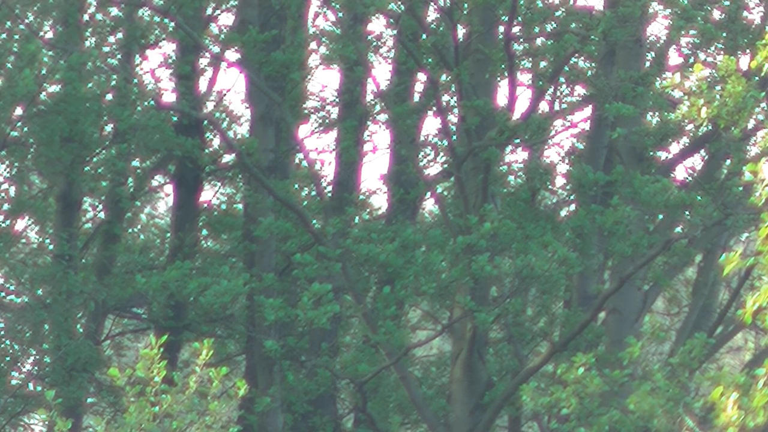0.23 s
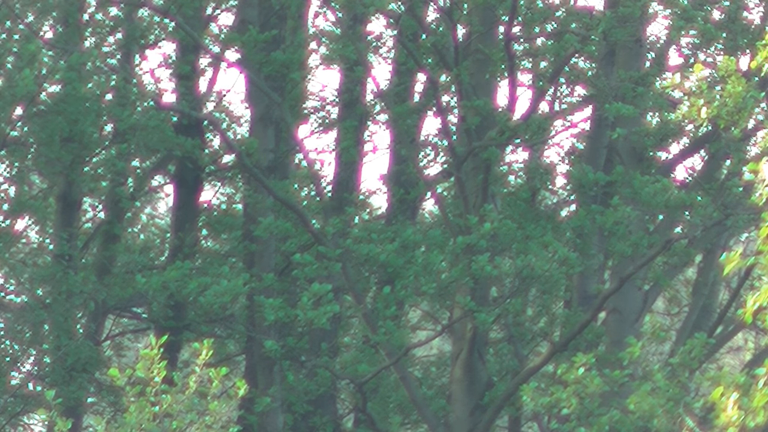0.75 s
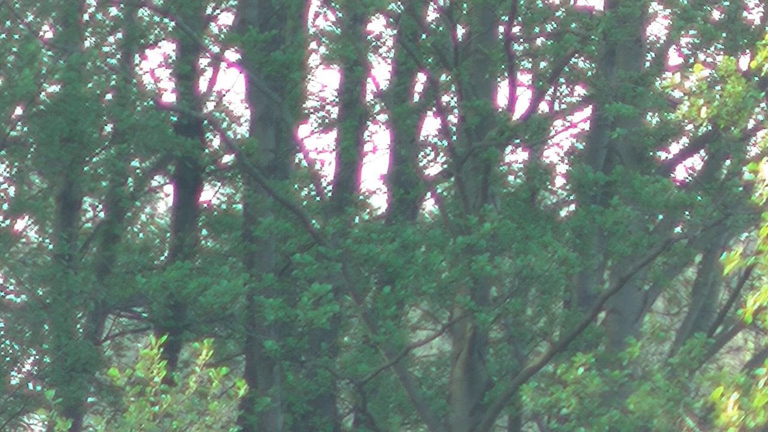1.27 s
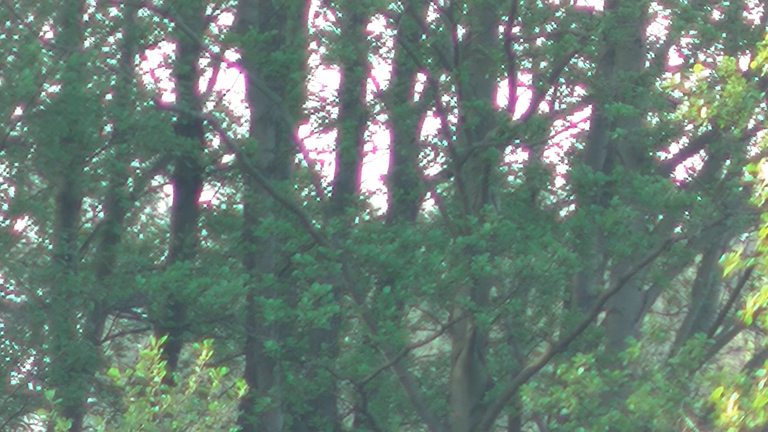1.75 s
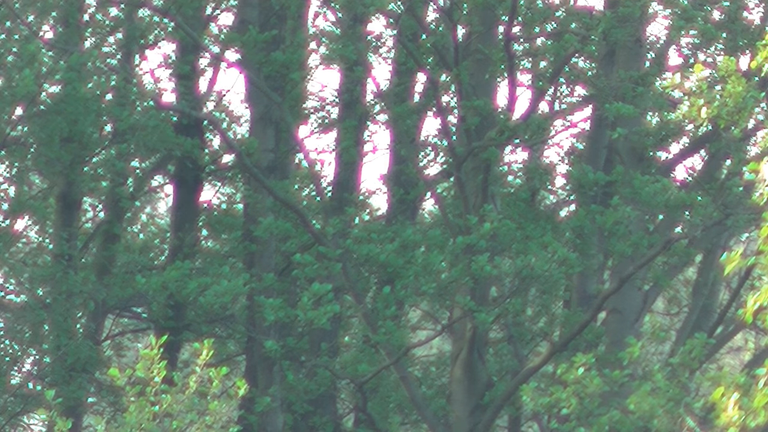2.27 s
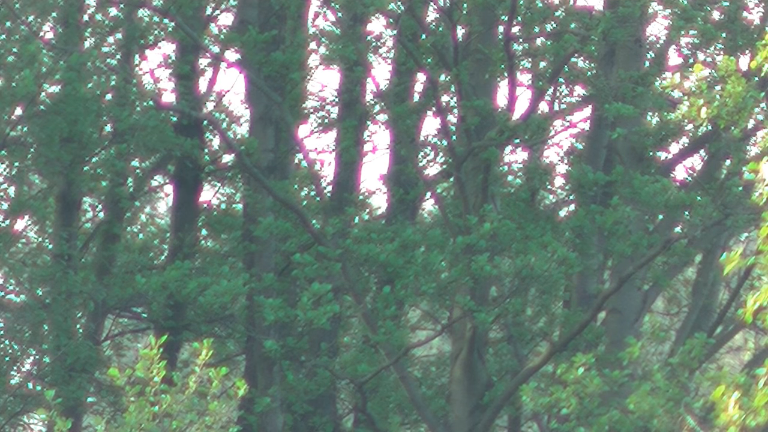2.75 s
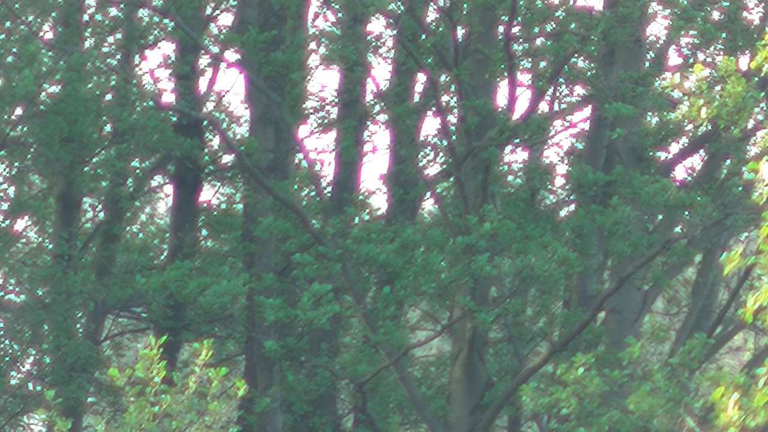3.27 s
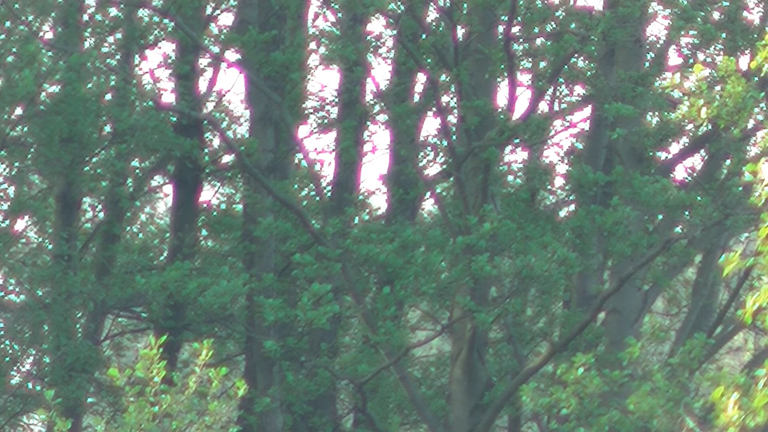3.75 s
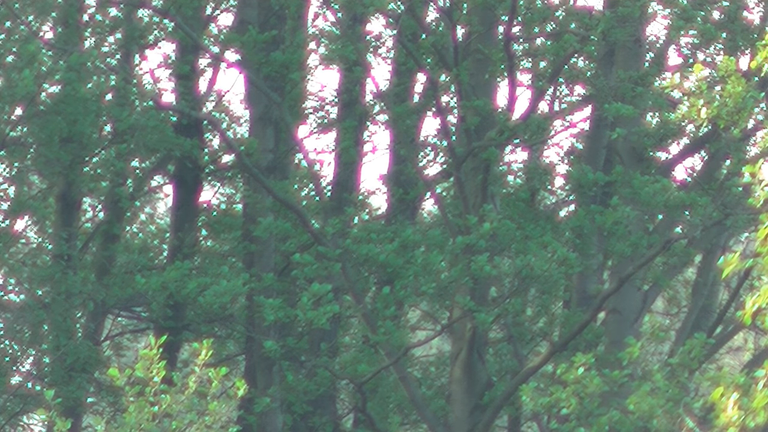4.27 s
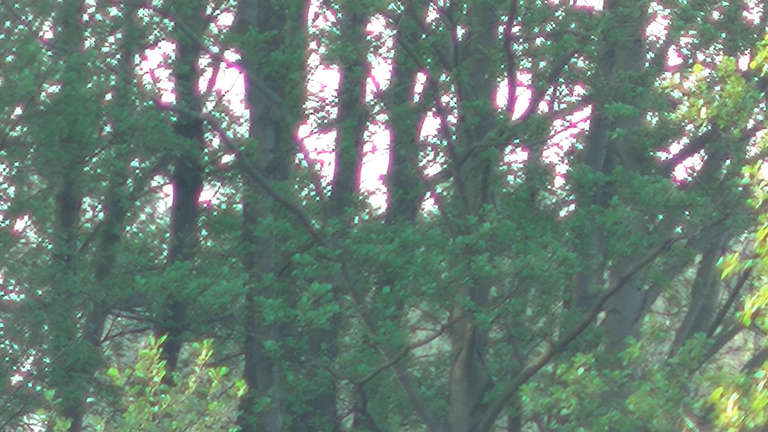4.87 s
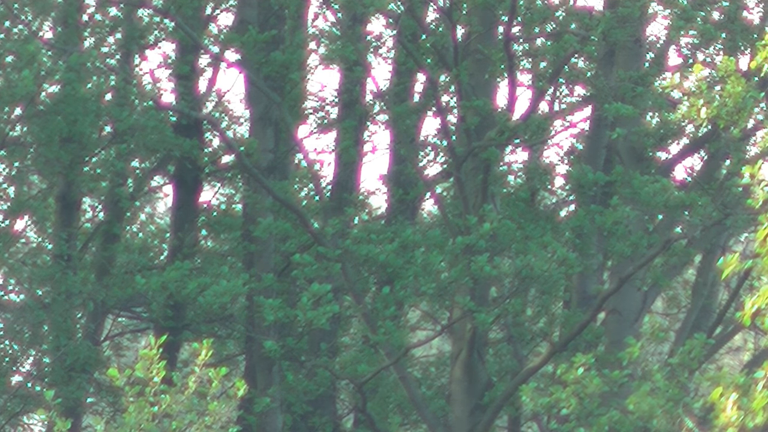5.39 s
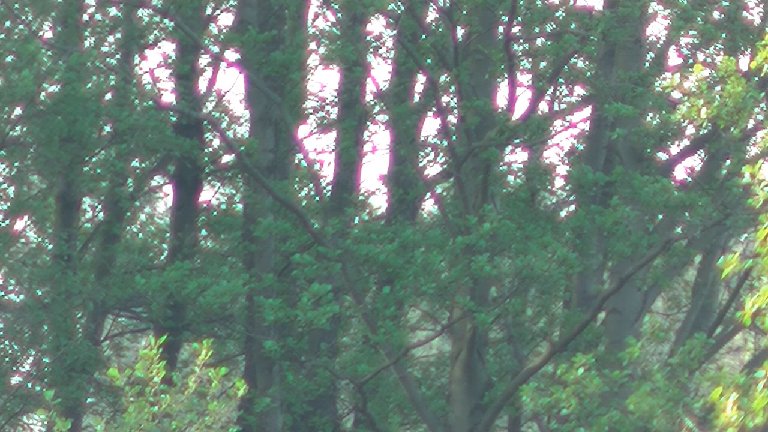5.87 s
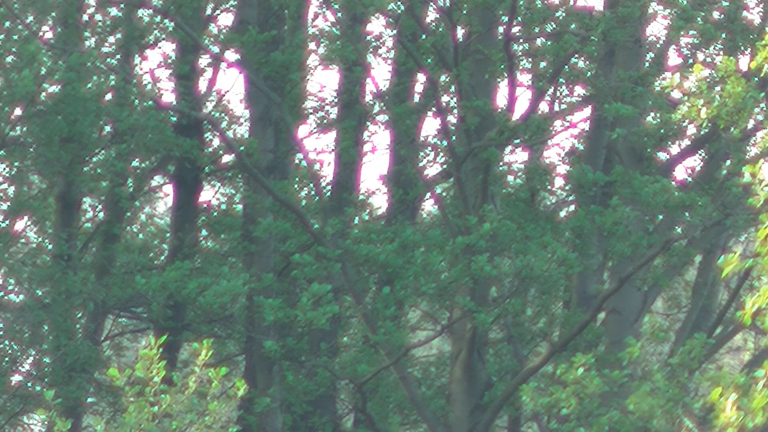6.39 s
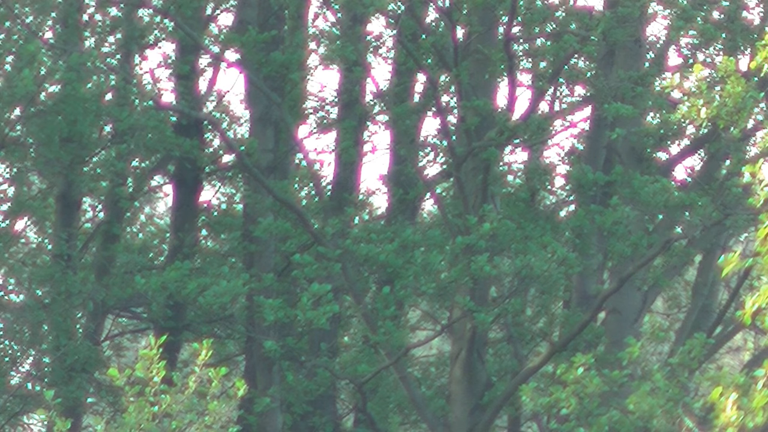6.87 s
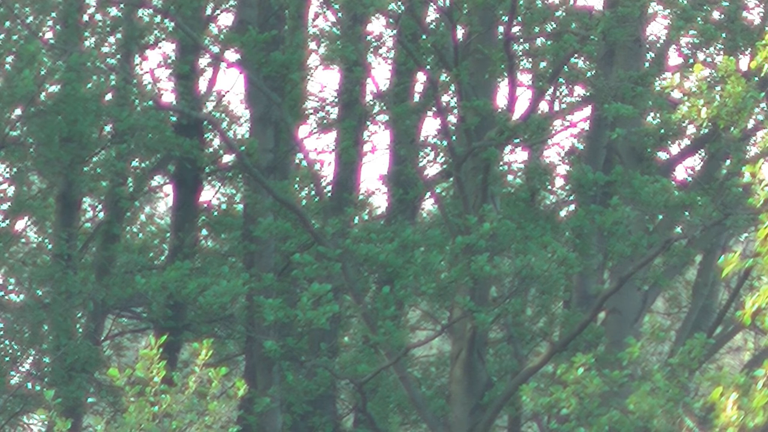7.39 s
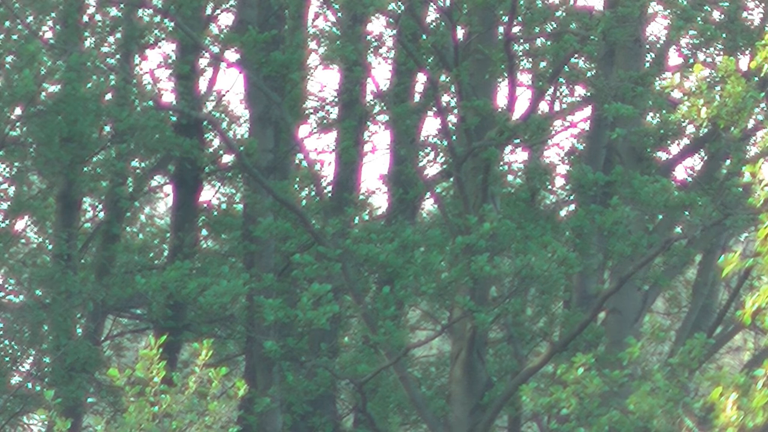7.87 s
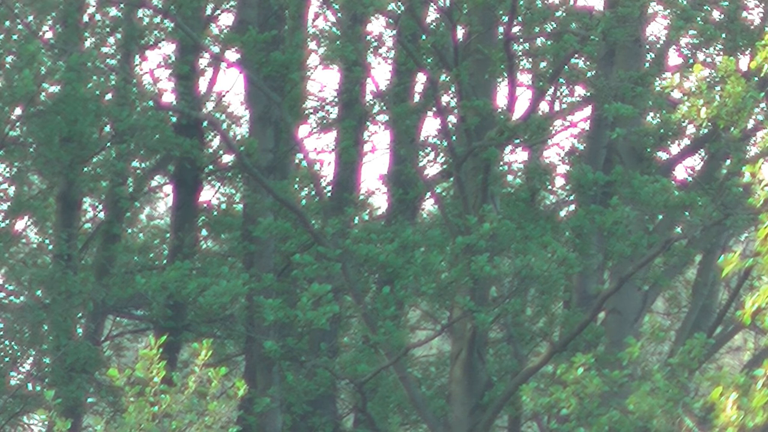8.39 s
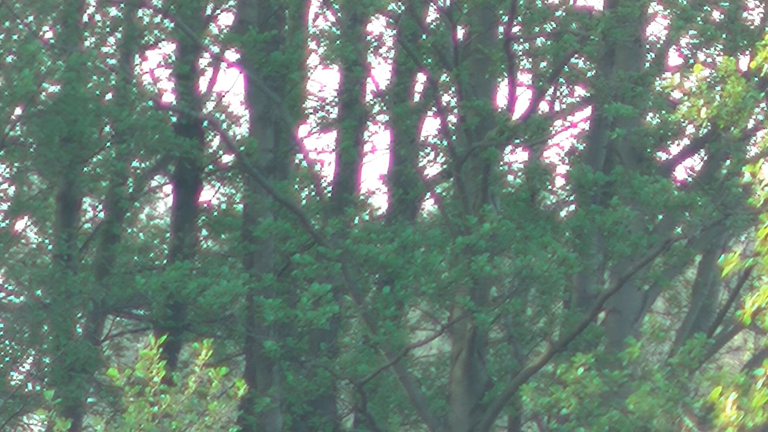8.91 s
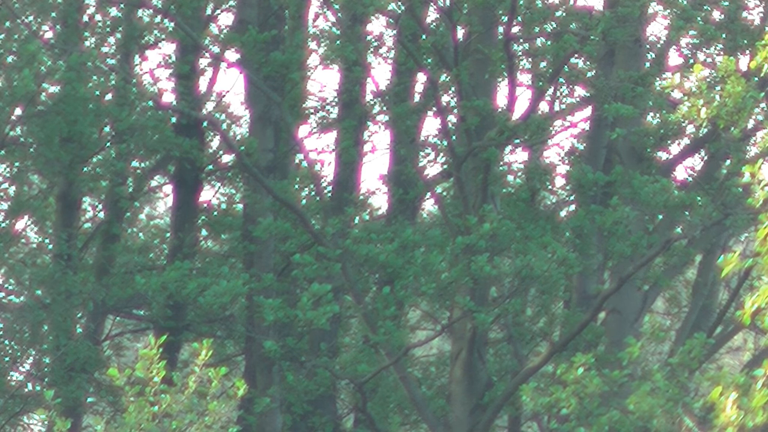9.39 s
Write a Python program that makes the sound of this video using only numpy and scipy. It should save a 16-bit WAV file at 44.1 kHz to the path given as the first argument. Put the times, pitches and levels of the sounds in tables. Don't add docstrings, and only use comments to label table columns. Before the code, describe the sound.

Dense dawn birdsong runs from start to finish: quick falling whistles and clean chips first, then a single woodpecker roll of about thirty knocks with a woody ring, harsh chirps around it. Low flute notes and falling trills follow, then rising swees, plunging notes, quick upward whips and rough churs. Trees smear the sound gently. A bass-poor, almost mono microphone leaves soft hiss and a faint high whine.

```python
import sys
import numpy as np
from scipy import signal
from scipy.fft import rfft, irfft, next_fast_len
from scipy.io import wavfile
from scipy.ndimage import map_coordinates

SR = 44100
rng = np.random.default_rng(int(sys.argv[2]) if len(sys.argv) > 2 else 0)


def volts(x):
    e = np.asarray(x, float) / 20
    return 10 ** e


def unload_wav(signal):
    wavfile.write(
        sys.argv[1],
        SR,
        np.round(np.clip(np.atleast_2d(signal).T, -1, 1) * 32767).astype(np.int16),
    )


N = 425565


def along(points, hz):
    f, v = np.transpose(points)
    return np.interp(np.log(hz + 1), np.log(f + 1), v)


def unit(x):
    return x / np.sqrt(np.mean(x ** 2) + 1e-20)


def wobble(rate):
    knots = rng.standard_normal(int(N * rate / SR) + 4)
    return map_coordinates(knots, [np.arange(N) * rate / SR])


def filtered(x, response):
    m = next_fast_len(N + SR // 2)
    return irfft(rfft(x, m) * response(np.fft.rfftfreq(m, 1 / SR)), m)[..., :N]


def above(x, edge_hz, order):
    return signal.sosfilt(signal.butter(order, edge_hz, "high", fs=SR, output="sos"), x)


# blow number, time in seconds.
ROLL = [
    (0, 1.9487),
    (11, 2.5379),
    (15, 2.7594),
    (18, 2.921),
    (31, 3.6396),
]


def pecks():
    full_db, run_up_db, run_up_blows = -18.5, 7.5, 1.28
    tire_db, tire_blows = 4, 0.82
    scatter_s, scatter_db = .0004, .6
    number, s = np.transpose(ROLL)
    k = np.arange(number[-1] + 1)
    late, hard = rng.standard_normal((len(k), 2)).T
    db = full_db - run_up_db * np.exp(-k / run_up_blows) - tire_db * np.exp(-k[::-1] / tire_blows)
    return zip(np.interp(k, number, s) + scatter_s * late, db + scatter_db * hard)


# pitch in Hz, width in Hz, level in dB.
TRUNK = [(1225, 320, 4.5), (1750, 400, 1.5), (2250, 500, -3.5), (3300, 1200, -14)]
# pitch in Hz, width in Hz, level in dB.
STUB = (1465, 150, -1)


def mode(f, centre_hz, width_hz, db):
    damping = 1j * f * width_hz
    return volts(db) * damping / (centre_hz ** 2 - f * f + damping)


def woodpecker():
    blows = np.zeros(N)
    for s, db in pecks():
        blows[round((s - .0009) * SR)] = volts(db + 25.0)

    def response(f):
        trunk = sum((-1) ** k * mode(f, *row) for k, row in enumerate(TRUNK))
        ground = 1 - .7 * np.exp(-2j * np.pi * f * .00198)
        return trunk * ground - mode(f, *STUB)

    return above(filtered(blows, response), edge_hz=1000, order=5)


def add(out, s, hz, gain, nasal_db=-60):
    phase = 2 * np.pi * (np.cumsum(hz) / SR + rng.random())
    nasal = np.sin(phase / 2) + .22 * np.sin(3 * phase / 2)
    tone = np.sqrt(2) * gain * (np.sin(phase) + volts(nasal_db) * nasal)
    out[max(round(s * SR), 0):][:len(tone)] += tone


def swell(length, ramp, onset=.7):
    u = np.linspace(0, 1, max(int(length * SR), 9))
    edge = np.minimum(u / onset, 1 - u) * length / min(ramp, length / 2)
    return u, np.sin(np.pi / 2 * np.clip(edge, 0, 1)) ** 2


def note(out, s, length, start_hz, mid_hz, end_hz, db, throat_db=0):
    u, shape = swell(length, ramp=0.01668)
    bend = 4 * u * (1 - u) * (mid_hz - (start_hz + end_hz) / 2)
    hz = start_hz + (end_hz - start_hz) * u + bend
    throat_loss = throat_db * np.abs(hz - 3956) / 1000
    nasal_db = -21 if length < .07 and mid_hz > 3100 else -60
    add(out, s, hz, volts(db - throat_loss) * shape, nasal_db)


# start in seconds, length in seconds, level in dB.
DIVES = [
    (0.021, 0.0238, -21),
    (0.299, 0.0442, -22),
    (0.551, 0.0542, -22.5),
    (0.783, 0.0446, -22.5),
]
# start in seconds, length in seconds, top in Hz, level in dB.
WHIPS = [
    (7.288, 0.0209, 4773, -20),
    (7.339, 0.0259, 4332, -23),
    (7.476, 0.0209, 4277, -20.5),
    (7.656, 0.0188, 4839, -21),
    (7.806, 0.0477, 4730, -23.5),
    (7.978, 0.057, 4666, -22.5),
    (8.14, 0.0493, 4820, -23),
    (8.337, 0.049, 4546, -21),
]


def dives_and_whips(out):
    top_hz, floor_hz, fall_s = 4425, 1496.8, .035
    for s, length, db in DIVES:
        fall = np.exp(-length / fall_s * np.arange(3) / 2)
        note(out, s, length, *floor_hz + (top_hz - floor_hz) * fall, db + 4, throat_db=8.5)
    for s, length, top_hz, db in WHIPS:
        slow = length > .035
        note(out, s, length, 2800, (.86 if slow else .76) * top_hz, top_hz, db + 1.5, throat_db=4)
        if slow:
            note(out, s + 0.0033, length, 2344, 2680, 2973, db - 12.5)


# start in seconds, level in dB.
DUETS = [
    (1.592, -28),
    (1.789, -27),
    (2.025, -26.5),
]
CHACKS = [
    (3.51, -20.5),
    (3.561, -21),
]
SWEES = [
    (5.375, -24.5),
    (5.662, -23.5),
    (5.913, -23),
]
CHOOS = [
    (6.291, -24.5),
    (6.511, -25.5),
    (6.739, -24),
]
CHURS = [
    (8.553, -22),
    (8.739, -21.5),
    (8.956, -22.5),
]
CLIMBS = [
    (3.754, -22.5),
    (4.022, -23),
]
ZITS = [
    (9.147, -23),
    (9.222, -27.5),
    (9.357, -25),
    (9.427, -27.5),
    (9.598, -25.5),
]


def syllables(out):
    for s, db in DUETS:
        note(out, s, 0.075, 3950, 4020, 3534, db)
        note(out, s, .085, 2700, 2620, 2413, db - 10)
    for s, db in CHACKS:
        note(out, s, 0.0278, 4260, 4030, 3350, db - 4)
        note(out, s + 0.0028, 0.02695, 3363, 3130, 2754, db)
    for s, db in SWEES:
        note(out, s, .072, 2880, 3290, 3350, db + 1.5)
        note(out, s + 0.0046, 0.0502, 4512, 4900, 4950, db - 22.5)
        note(out, s, 0.0598, 1395, 1650, 1830, db - 24)
        note(out, s + .006, .065, 4300, 4150, 4583, db - 7)
        note(out, s + .022, .05, 3230, 3500, 4544, db - 0.5)
    for s, db in CHOOS:
        note(out, s - .047, .032, 3263, 2370, 2090, db - 7.0)
        note(out, s - .033, 0.0217, 5132, 4450, 4370, db - 12.5)
        note(out, s, .046, 3860, 2480, 2085, db)
        note(out, s + .013, .026, 4971, 4370, 3570, db - 10.5)
    for s, db in CHURS:
        note(out, s, 0.05, 4050, 3300, 2618, db + 3.5, throat_db=7.5)
        note(out, s + .004, .04, 2433, 2150, 1910, db - 21.5)
    for s, db in CLIMBS:
        note(out, s, .055, 2295.7, 3130, 3313, db - 5.0)
        note(out, s + .038, .036, 3276.5, 3580, 4120, db)
    for s, db in ZITS:
        note(out, s, 0.01242, 5265, 3833, 2950, db - 4)


# start in seconds, length in seconds, start in Hz, end in Hz, level in dB.
THROBS = [
    (8.683, 0.0622, 3348, 3528, -19.5),
    (9.055, 0.077, 3256, 3596, -27),
    (9.405, 0.077, 3258, 3501, -23.5),
]


def throbs(out):
    throb_hz, depth = 46, .7
    for s, length, start_hz, end_hz, db in THROBS:
        u, shape = swell(length, ramp=0.0145)
        pulse = 1 - depth * np.cos(np.pi * throb_hz * length * u) ** 2
        add(out, s, start_hz + (end_hz - start_hz) * u, volts(db) * shape * pulse)


# time of its third, longest note in seconds, level in dB.
THIN_SONGS = [
    (3.013, -44.5),
    (9.265, -41),
]
# share of the note from 0 to 1, pitch in Hz.
CHIRP = [(0, 5684), (.2, 6980), (.35, 7200), (1, 6092)]


def thin_songs(out):
    for s, db in THIN_SONGS:
        note(out, s - .29, 0.089, 8120, 8050, 7980, db - 9)
        note(out, s - .215, 0.123, 8000, 7900, 7830, db + 1.0)
        note(out, s, 0.179, 7780, 7830, 7760, db + 1.0)
        u, shape = swell(.055, ramp=0.0128)
        for later in .25, .35:
            add(out, s + later, np.interp(u, *np.transpose(CHIRP)), volts(db + 3.5) * shape)


# start in seconds, length in seconds, start in Hz, end in Hz,
# level in dB. Slides run nearly straight.
SLIDES = [(0.008, 0.065, 3305, 2540, -23.5), (0.508, .05, 5700, 4250, -41),
          (0.737, 0.096, 3130, 2360, -32.5), (0.878, 0.064, 5700, 3950, -34),
          (1.023, 0.047, 3680, 2280, -28.5), (2.32, 0.0263, 2450, 2400, -35),
          (2.438, 0.035, 3740, 2970, -32.5), (2.471, 0.029, 3510, 3420, -25),
          (2.516, 0.0753, 3760, 4030, -30.5), (2.523, 0.038, 2500, 2602, -25.5),
          (2.679, 0.0295, 3855, 3400, -23), (3.137, 0.047, 3000, 2540, -38.5),
          (3.542, 0.05, 2740, 2800, -36.5), (3.74, 0.034, 7100, 5730, -45), (4.123, .06, 3440, 4542, -36.5),
          (1.452, 0.0601, 2480, 2330, -39), (2, .04, 2700, 2400, -40.5),
               (.11, 0.0433, 3100, 2100, -36), (.255, 0.0163, 3800, 3850, -30),
               (.49, 0.0554, 4350, 3750, -34.5), (.455, 0.0405, 3400, 2900, -36.5),
               (.75, 0.0403, 4500, 4050, -35), (6.8, 0.0299, 3750, 4500, -36.5),
               (6.425, 0.0495, 3600, 2900, -40), (6.535, 0.0205, 3500, 2900, -30.5),
               (6.56, 0.0394, 2950, 3250, -37.5), (7.512, 0.0305, 2100, 2380, -32.5),
               (9.315, 0.0295, 2100, 2227, -40), (9.525, .07, 3500, 4100, -40),
               (2.843, .016, 3600, 2600, -40.5), (8.869, 0.07, 4200, 3850, -40.5),
               (8.853, .032, 4600, 3400, -35), (9.117, 0.048, 2150, 2210, -43),
               (9.25, 0.0436, 3530, 3300, -40), (4.374, .024, 5800, 3800, -38.5),
               (4.46, .02, 5500, 3600, -39.5), (6, .03, 3350, 2600, -38), (8.463, 0.0312, 3150, 2600, -37),
               (8.518, 0.015, 2600, 2100, -41.5), (9.6, .014, 2480, 2520, -37),
               (7.1, .032, 3900, 2800, -35), (2.7, .032, 3950, 4200, -32), (3.15, 0.034, 3350, 2950, -40),
               (4.5, 0.016, 2750, 2780, -31), (8.095, .035, 1800, 2400, -41.5),
               (8.275, 0.0307, 1950, 2700, -41.5), (5.815, .03, 4900, 4450, -48.5),
               (8.29, 0.0163, 3300, 3900, -35.5), (4.468, .016, 2250, 1800, -34),
               (2.683, .03, 2300, 2300, -37), (9.616, 0.034, 4520, 3560, -28)]
FLUTES = [(0.268, 0.1246, 2467, 2674, -26), (0.367, 0.178, 2915, 2643, -28.5),
          (3.903, .068, 1800, 2020, -40), (4.023, 0.0552, 2021, 1867, -34.5),
          (4.339, 0.035, 3354, 2183, -30.5), (4.354, 0.0376, 4350, 3520, -24.5),
          (4.392, 0.0626, 3685, 2416, -23.5), (4.272, 0.1236, 2001, 1748, -35),
          (4.549, 0.075, 2010, 2280, -32), (4.44, 0.104, 1443, 1561, -47.5),
          (4.766, 0.064, 1664, 1601, -45.5), (4.958, .14, 1850, 1579, -46.5),
          (5.295, 0.0794, 2458, 2372, -35.5), (5.361, 0.066, 1722, 1850, -37.5),
          (5.599, 0.1274, 2402, 2800, -26.5), (5.716, 0.037, 2722, 2942, -25)]
HOOKS = [(0.222, 0.0645, 1616, 2355, -31.5), (2.307, 0.038, 4050, 3610, -27),
         (3.865, 0.0446, 5900, 5160, -37), (3.883, 0.0613, 3820, 3495, -32.5),
         (4.652, .095, 3250, 3800, -33), (4.185, 0.13, 2070, 2339, -23), (6.9, 0.03, 2830, 3290, -42),
         (7.745, 0.0374, 1960, 3120, -25), (8.194, 0.067, 5950, 5670, -41.5),
         (8.239, 0.14, 5600, 5550, -44.5), (8.36, 0.091, 5800, 5400, -51), (5.038, .032, 3120, 4370, -30.5),
         (5.082, 0.0208, 3000, 4230, -30.5), (5.233, .028, 3470, 4030, -40.5),
         (5.051, .03, 2270, 2570, -33), (5.308, 0.0198, 5900, 3500, -40), (9.003, .05, 1530, 1890, -49),
         (4.396, 0.0157, 3900, 4550, -32.5), (4.4, 0.014, 4200, 4330, -31), (5.05, .028, 5300, 5500, -46.5),
         (5.083, 0.031, 4500, 5180, -42.5), (1.286, 0.072, 3730, 3880, -29), (0.94, .03, 4000, 3000, -37.5),
         (9.589, 0.043, 5180, 3400, -33)]
FLICKS = [(2.715, 0.0412, 3816, 3423, -25), (2.728, 0.0285, 2610, 2294, -29),
          (4.248, 0.028, 4250, 3300, -35.5), (4.301, 0.03, 3950, 3103, -29),
          (4.86, 0.0955, 3440, 2958, -27), (5.292, 0.0163, 3265, 5500, -42),
          (3.955, 0.0208, 1977, 2620, -30.5), (3.981, 0.0208, 1966, 2860, -32.5),
          (4.003, 0.021, 2062, 2500, -29.5), (7.387, 0.0278, 2435, 3030, -29),
          (7.698, 0.0214, 2526, 3250, -26), (8.327, 0.033, 3335, 4820, -34.5),
          (9.47, 0.0463, 3380, 2430, -29.5), (4.752, 0.16, 3670, 3466, -40.5),
          (9.118, 0.0508, 3616, 2914, -29), (8.527, 0.061, 4140, 3810, -35)]
GONE_AT_HALF = (0.54, .5, 0.9776, 0.1395)
# start in seconds, length in seconds, end in Hz, middle in Hz,
# level in dB.
BOWS = [
    (0.919, 0.049, 4800, 4190, -30),
    (0.946, 0.0657, 3630, 4180, -37),
    (1.012, 0.037, 4520, 3583, -22.5),
    (1.034, 0.072, 3160, 3740, -31.5),
    (4.448, 0.0496, 2820, 2980, -32),
    (4.168, 0.016, 1880, 2200, -35.5),
    (1.3, 0.0773, 2200, 2590, -34),
]


def whistles(out):
    tables = SLIDES, FLUTES, HOOKS, FLICKS
    for table, gone in zip(tables, GONE_AT_HALF):
        for s, length, start_hz, end_hz, db in table:
            note(out, s, length, start_hz, start_hz + gone * (end_hz - start_hz), end_hz, db)
    for s, length, end_hz, mid_hz, db in BOWS:
        note(out, s, length, end_hz, mid_hz, end_hz, db)


def held_flute(out):
    length, start_hz, end_hz = 0.2614, 2500, 2665
    u, shape = swell(length, ramp=0.0148)
    hz = end_hz + (start_hz - end_hz) * np.exp(-u * length / .07)
    add(out, 4.5, hz, volts(-18.5 - 7 * u) * shape)


# start in seconds, length in seconds, sweeps a second, from Hz, level in dB.
TRILLS = [
    (4.51, 0.153, 43.7, 4302, -24.5),
    (4.811, 0.134, 44, 4272, -26.5),
    (5.099, 0.114, 42, 4065, -25.5),
]
# start in seconds, length in seconds, sweeps a second, from Hz, to Hz.
FAINT_TRILLS = [
    (1.515, 0.114, 55, 4798, 5750),
    (3.8, 0.079, 78, 7000, 5300),
]
# start in seconds, length in seconds, sweeps a second, from Hz, to Hz, level in dB.
STUTTERS = [
    (6.988, 0.0416, 79, 2400, 3900, -29.5),
    (7.102, 0.0344, 51.9, 3200, 4500, -28.5),
    (7.07, .03, 65, 2600, 4700, -32.5),
]


def trills(out):
    falling = [(*row, hz, 2800, db) for *row, hz, db in TRILLS]
    faint = [(*row, -40.5) for row in FAINT_TRILLS]
    for s, length, rate, from_hz, to_hz, db in falling + faint + STUTTERS:
        u, shape = swell(length, ramp=0.0126)
        beat = (u * length * rate) % 1
        slide = 1 - (1 - beat) ** 1.7
        pulse = np.sin(np.pi * beat ** 1.105) ** 1.58
        add(out, s, from_hz + (to_hz - from_hz) * slide, volts(db) * (0.149 + 0.934 * shape) * pulse)


# start in seconds, length in seconds, wobbles a second, centre in
# Hz, swing in Hz.
WARBLES = [
    (4.597, 0.075, 45, 2416, 350),
]
SOFT_WARBLES = [
    (4.634, 0.1073, 47.4, 1925, 83.5),
    (5.413, 0.1345, 35, 1980, 226),
    (3.394, 0.074, 20, 3120, -260),
]


def warbles(out):
    for table, db in (WARBLES, -25.5), (SOFT_WARBLES, -34):
        for s, length, rate, centre_hz, swing_hz in table:
            u, shape = swell(length, ramp=0.0122)
            add(out, s, centre_hz + swing_hz * np.sin(2 * np.pi * rate * length * u), volts(db) * shape)


def songbirds():
    out = np.zeros(N + SR)
    for sing in dives_and_whips, syllables, throbs, thin_songs, whistles, held_flute, trills, warbles:
        sing(out)
    return out[:N] * volts(1.3 * np.tanh(wobble(90)))


# start in seconds, length in seconds, start in Hz,
# end in Hz, level in dB.
RASPS = [
    (1.633, 0.0426, 3590, 2995, -32.5),
    (1.827, 0.036, 3880, 3291, -29.5),
    (2.273, 0.025, 3546, 3590, -28.5),
    (2.478, 0.022, 3680, 3980, -28),
    (2.521, 0.0205, 3796, 3915, -24.5),
]
BURRS = [(3.285, 0.0455, 4400, 3700, -30), (2.68, 0.0207, 3900, 4300, -30.5),
         (2.712, 0.0397, 3800, 3500, -25), (2.921, 0.027, 4350, 2800, -22),
         (2.936, 0.0516, 3100, 2660, -27), (2.931, 0.072, 4200, 4400, -36.5),
         (3.027, 0.045, 4450, 3100, -25.5), (3.188, 0.047, 4170, 2565, -26.5),
         (3.209, 0.0557, 2500, 2460, -28.5)]


def rasps():
    coarse_hz, fine_hz = 767.4, 341
    return ([(*row, coarse_hz, db) for *row, db in RASPS]
            + [(*row, fine_hz, db) for *row, db in BURRS]
            + [(s, .073, 3440, 4000, 700, db - 10) for s, db in SWEES]
            + [(s - .003, .03, 4350, 3900, 380, db - 3.5) for s, db in CHURS]
            + [(s + .008, length, 3500, 1.2 * top_hz, 420, db - 9.5) for s, length, top_hz, db in WHIPS]
            + [(s + 0.0091, .068, 3200, 4100, fine_hz, db - 7) for s, db in CLIMBS]
            + [(s + .005, .044, 3800, 3180, coarse_hz, db - 1.5) for s, db in ZITS])


# start in seconds, level in dB.
CHIPS = [
    (1.095, -25.5),
    (1.203, -25.5),
    (1.315, -25.5),
    (1.425, -26),
]


def harsh_singer():
    out = np.zeros(N + SR)
    shake = np.tanh(.9 * wobble(1300))
    throb = volts(2 * wobble(260))
    for s, length, start_hz, end_hz, spread_hz, db in rasps():
        u, shape = swell(length, ramp=0.0184, onset=0.297)
        k = round(s * SR) + np.arange(len(u))
        hz = start_hz + (end_hz - start_hz) * u + 1.533 * spread_hz * shake[k]
        add(out, s, hz, volts(db - 1.89 * u) * shape * throb[k])
    out = signal.sosfilt(signal.butter(3, (2250, 4850), "band", fs=SR, output="sos"), out)
    for s, db in CHIPS:
        u, shape = swell(.047, ramp=0.024)
        add(out, s, 4250 - 1250 * np.abs(2 * u - 1) ** 0.9, volts(db) * shape)
    return out[:N]


# start in seconds, level in dB.
TUKS = [
    (6.075, -37.5),
    (6.345, -39.5),
    (6.592, -38),
    (6.828, -36.5),
    (7.059, -37.5),
    (7.283, -39.5),
    (7.49, -40.5),
    (7.915, -40),
]
PAIRS = [
    (.245, -37),
    (.475, -32.5),
    (.705, -31.5),
    (.94, -34.5),
]


def low_figures():
    out = np.zeros(N + SR)
    for s, db in TUKS:
        note(out, s, 0.04, 2459.4, 1908.6, 1415, db + 0.5)
    for s, db in PAIRS:
        note(out, s, 0.0178, 2191, 1845, 1770, db)
        note(out, s + .042, 0.0203, 1193, 2073, 2130, db)
    return out[:N]


# start in seconds, peak in dB, ring in Hz.
TICKS = [
    (.9045, -17, 7600),
    (1.492, -24, 7200),
    (7.678, -40, 1050),
]


def ticks():
    out, t = np.zeros(N + SR), np.arange(SR // 50) / SR
    for s, db, hz in TICKS:
        ring = np.sin(2 * np.pi * hz * t) + 0.43 * np.sin(2 * np.pi * 0.7376 * hz * t)
        ring += 0.116 * rng.standard_normal(len(t))
        decay = volts(db + 5.5 - 60 * t / 0.00848)
        out[round(s * SR):][:len(t)] += decay * (1 - np.exp(-t / 0.000357)) * ring
    return above(out[:N], edge_hz=303, order=2)


def near_trunks(x, count=9):
    delay = np.sort(rng.uniform(.006, .03, count))
    sign = rng.choice([-1, 1], count)

    def response(f):
        ground = 0.171 * np.exp(-2j * np.pi * f * 0.0023)
        copies = sum(g * volts(-15.5 - 250 * d) * np.exp(-2j * np.pi * f * d) for d, g in zip(delay, sign))
        return 1 - ground + copies

    return filtered(x, response)


# frequency in Hz, time to fall 60 dB in seconds.
WOOD = [(800, 0.246), (3000, 0.1107), (8000, 0.199)]


def trees(x, apart):
    hz, t, z = signal.stft(rng.standard_normal((2, SR // 2)), SR, nperseg=256)
    tail = signal.istft(z * volts(-60 * t / along(WOOD, hz)[:, None]), SR, nperseg=256)[1]
    tail = tail / np.linalg.norm(tail[0])
    mid, side = signal.fftconvolve(np.pad(x, (200, 0))[None], tail, axes=1)[:, :N]
    return np.array([mid + apart * side, mid - apart * side])


# time in seconds, level in dB.
FAR = [
    (0, -31.5),
    (3.9, -38),
    (4.8, -30.5),
    (5.9, -38),
    (9.65, -38),
]
# frequency in Hz, density in dB per Hz.
FAR_BAND = [(1300, -33), (1900, -5.5), (2600, -3), (3500, 1.5), (4300, 0.5), (5000, -17), (6500, -33)]


def far_chorus(count=2400):
    out = np.zeros(N + SR)
    draws = zip(rng.random(count), *rng.standard_normal((5, count)))
    for when, size, pitch, glide, bend, strength in draws:
        hz = 3100 * np.exp(.3 * pitch)
        length = .022 * np.exp(.4 * size)
        db = 2.5 * np.tanh(strength) - 3 * max(size, 0)
        note(out, when * N / SR, length, hz * (1 - .12 * glide), hz * (1 + .03 * bend), hz * (1 + .12 * glide), db)
    blur = rng.standard_normal(N) * volts(1.3 * wobble(12.0))
    mix = unit(out[:N]) + volts(-1) * unit(blur)
    s, db = np.transpose(FAR)
    coloured = unit(filtered(mix, lambda hz: volts(along(FAR_BAND, hz))))
    return coloured * volts(np.interp(np.arange(N) / SR, s, db))


# frequency in Hz, density in dB per Hz.
HISS = [(15, -58.5), (25, -36), (60, -47), (189, -42.5), (729, -15), (1350, -12.5), (3390, -3), (4100, -7),
        (5220, -15), (7410, -17.5), (8040, -18.5), (8720, -19.5), (15800, -25)]
# frequency in Hz, correlation from 0 to 1.
ALIKE = [(30, .75), (70, .6), (125, 0.39), (300, 0.078), (600, 0.344), (1200, 0.753), (3000, 0.9895),
         (8000, 1), (13000, 1)]
# pitch in Hz, rms level in dB.
WHINE = [(7801, -58), (7826, -64.5), (7853, -83.5), (15625, -87.5)]


def hiss():
    def mid_and_side(hz):
        turn = np.arccos(np.clip(along(ALIKE, hz), -1, 1)) / 2
        return volts(along(HISS, hz)) * [np.cos(turn), np.sin(turn)]

    mid, side = filtered(rng.standard_normal((2, N)), mid_and_side)
    noise = volts(-39.5) * unit(np.array([mid + side, mid - side]))
    t, whine = np.arange(N) / SR, np.zeros(N)
    for hz, db in WHINE:
        level = np.sqrt(2) * volts(db + 1.5 * wobble(5))
        whine += level * np.sin(2 * np.pi * hz * t + 2.2 * wobble(40))
    return noise + whine


def scene():
    drum = woodpecker()
    birds = near_trunks(songbirds() + harsh_singer() + low_figures())
    far = far_chorus()
    echoes = volts(-11.0) * trees(birds, 0.191) + volts(-6.0) * trees(far, 0.047) + volts(-15) * trees(drum, 0.075)
    direct = birds + 0.721 * far + drum + ticks()
    return (direct + echoes) * volts([[-.15], [.15]]) + hiss()


def low_pass(x):
    return signal.sosfilt(signal.butter(12, 15930, fs=SR, output="sos"), x)


def record(dry):
    soft = dry / (1 + np.abs(dry / .5) ** 4) ** (1 / 4)
    return low_pass(soft)


dry = scene()
out = record(dry)
unload_wav(out)
```